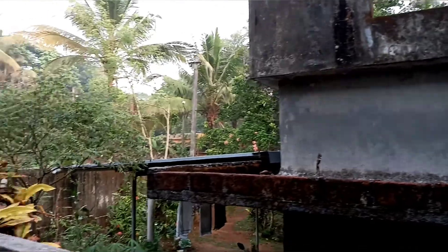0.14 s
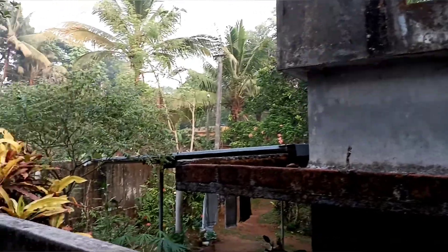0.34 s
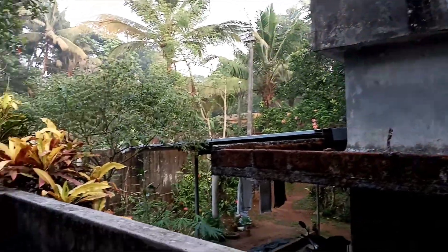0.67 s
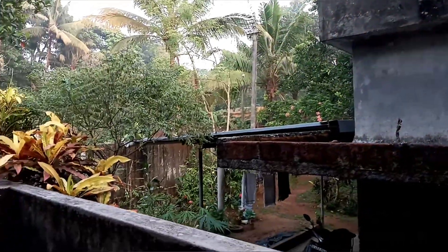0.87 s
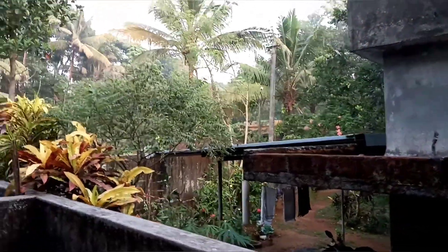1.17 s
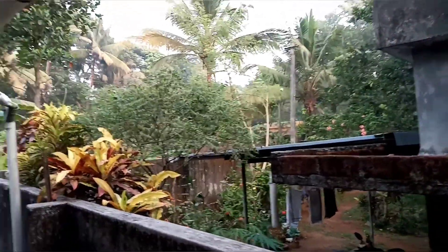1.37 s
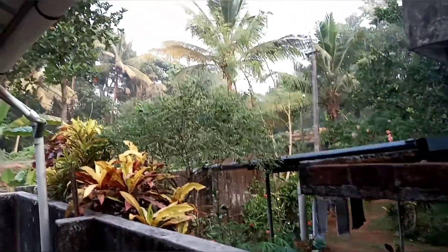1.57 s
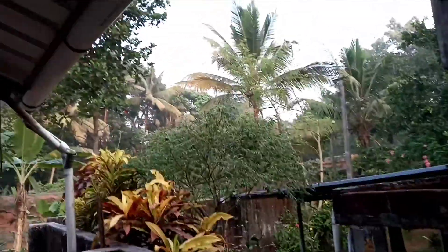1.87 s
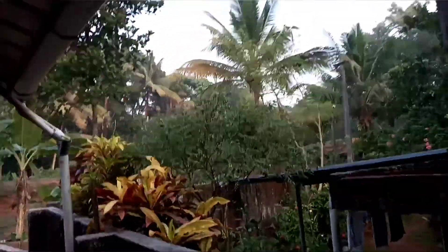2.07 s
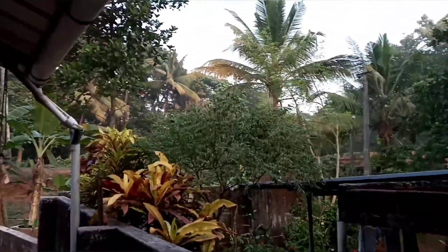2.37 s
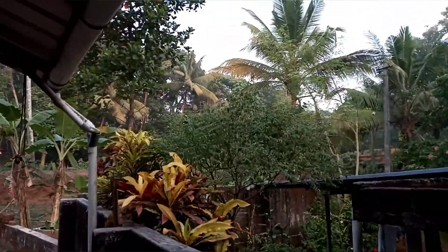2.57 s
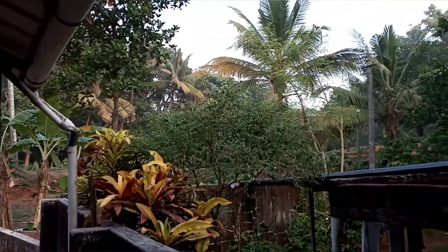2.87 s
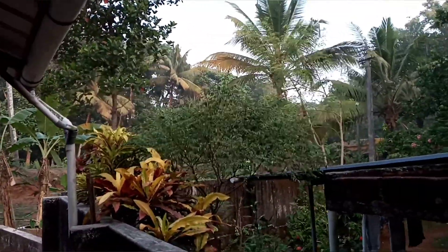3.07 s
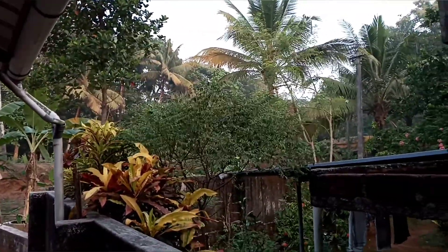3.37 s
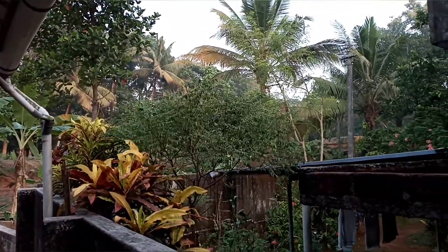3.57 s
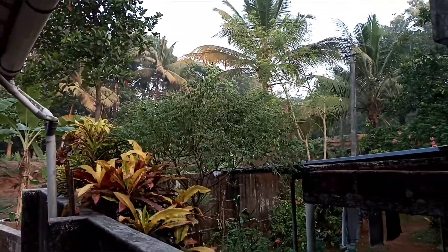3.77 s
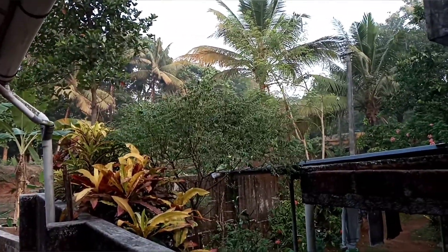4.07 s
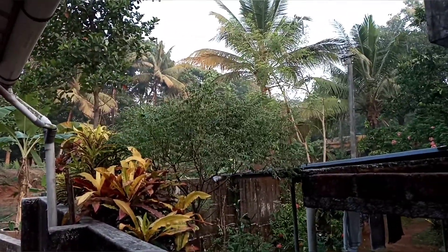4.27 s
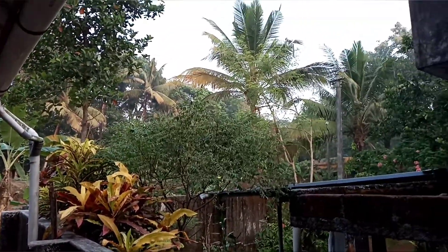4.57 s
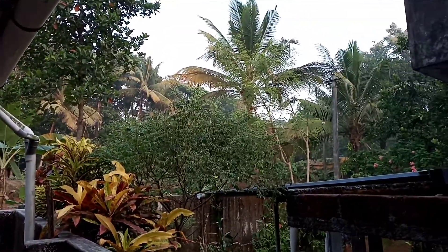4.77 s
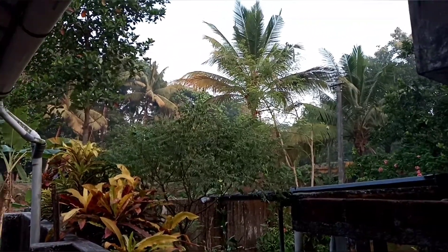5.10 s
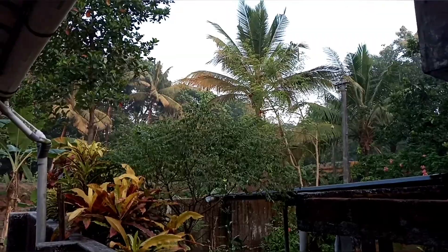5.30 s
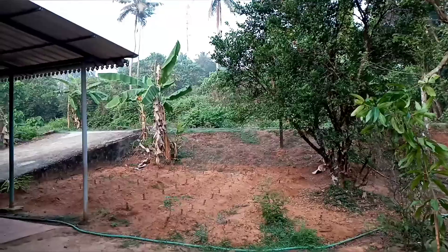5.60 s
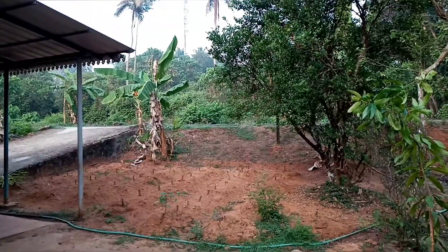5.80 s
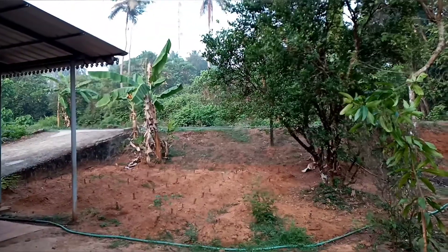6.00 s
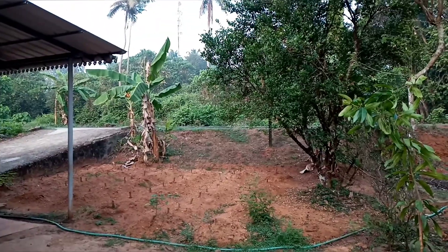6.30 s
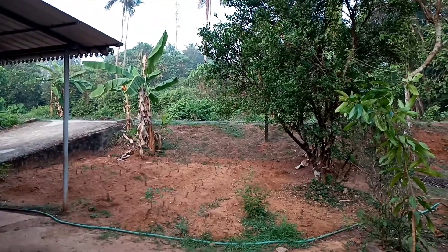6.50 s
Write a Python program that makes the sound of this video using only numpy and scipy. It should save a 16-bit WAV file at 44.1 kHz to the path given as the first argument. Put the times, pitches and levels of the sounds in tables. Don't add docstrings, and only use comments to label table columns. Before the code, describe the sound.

Many small birds pipe, chirp and whistle through reverberant trees over high pulsing crickets and a soft low hum. A hollow, woody tok repeats steadily through most of the first spot. The phone in the hand adds cloth rustles, clicks and dull bumps; a splintery snap is followed by a short scrape of a sole on concrete. After a sudden cut the birds thin out, a crow caws once, and breeze ends with a bump.

```python
import sys
import numpy as np
from scipy import signal
from scipy.fft import rfft, irfft, next_fast_len
from scipy.io import wavfile

SR = 44100
rng = np.random.default_rng(int(sys.argv[2]) if len(sys.argv) > 2 else 0)


def put_to_file(sound):
    columns = np.atleast_2d(sound).T
    safe = np.clip(columns, -1, 1)
    whole_steps = np.round(safe * 32767)
    wavfile.write(sys.argv[1], SR, whole_steps.astype(np.int16))


def natural_amplitude(level_db):
    exponent = np.asarray(level_db, float) / 20
    return 10 ** exponent


N = 293265
CUT_S = 5.572


def unit(x):
    return x / np.sqrt(np.mean(x ** 2) + 1e-20)


def in_time(rows, outside=None):
    s, *columns = np.transpose(rows)
    return [np.interp(np.arange(N) / SR, s, c, outside, outside) for c in columns]


def colour(x, spectrum):
    hz, db = np.transpose(spectrum)
    size = next_fast_len(len(x))
    grid_hz = np.arange(size // 2 + 1) * SR / size + 1
    gain = natural_amplitude(np.interp(np.log(grid_hz), np.log(hz), db))
    return irfft(rfft(x, size) * gain, size)[:len(x)]


def band(x, low_hz, high_hz, order=2):
    sos = signal.butter(order, [low_hz, min(high_hz, .45 * SR)], "band", fs=SR, output="sos")
    return signal.sosfilt(sos, x)


def drift(rate_hz):
    knots = rng.standard_normal(400)
    return np.interp(np.arange(N) / SR * rate_hz * 2, np.arange(400), knots) * 2.47


def add(out, s, sound):
    i = max(round(s * SR), 0)
    out[i:i + len(sound)] += sound[:N - i]


def bed(first_db, turn_db, loss_db, fade_db):
    t = np.arange(N) / SR
    before_db = first_db + turn_db * np.minimum(t, CUT_S)
    return natural_amplitude(before_db - (t >= CUT_S) * (loss_db + fade_db * (t - CUT_S)))


def swells(rows, order):
    t = np.arange(N) / SR
    return sum(natural_amplitude(db) * np.exp(-((t - s) / half_s) ** order) for s, half_s, db in rows)


def trees(x, t60, wet_db, build_s=0.0086, direct_db=0., lumps_db=5.0):
    t = np.arange(round(1.2 * SR)) / SR
    lumps = natural_amplitude(lumps_db * np.interp(t, np.arange(50) / 40, rng.standard_normal(50)))
    tail = rng.standard_normal(len(t)) * lumps * natural_amplitude(-60 * t / t60) * (1 - np.exp(-t / build_s))
    tail /= np.sqrt(np.sum(tail ** 2))
    return natural_amplitude(direct_db) * x + natural_amplitude(wet_db) * signal.fftconvolve(x, tail)[:N]


def whistle(length_s, hz, edge=0.052, second_db=-29.0):
    u = np.linspace(0, 1, max(round(length_s * SR), 8))
    waver = 1 + .008 * np.interp(u * length_s, np.arange(40) / 110, rng.standard_normal(40))
    pitch_hz = waver * np.polyval(np.polyfit([0, .5, 1], hz, 2), u)
    phase = 2 * np.pi * np.cumsum(pitch_hz) / SR
    shape = np.sin(np.pi / 2 * np.clip(np.minimum(u, 1 - u) / edge, 0, 1)) ** 2
    return np.sqrt(2) * shape * (np.sin(phase) + natural_amplitude(second_db) * np.sin(2 * phase))


def choir(rows, t60, wet_db, direct_db, flicker_db):
    out = np.zeros(N)
    for s, length_s, *hz, db in rows:
        add(out, s, natural_amplitude(db) * whistle(length_s, hz, edge=0.11))
    flicker = natural_amplitude(flicker_db * np.clip(drift(40), -3, 1.2))
    return natural_amplitude(direct_db) * flicker * out + trees(out, t60, wet_db, direct_db=-99.5)


def glides(rows):
    return [(s, length_s, hz * 2 ** (-step / 24), hz, hz * 2 ** (step / 24), db)
            for s, length_s, hz, step, db in rows]


def hiss():
    # middle_s, half_length_s, share_lost
    dips = [
        (3.42, .06, .6),
        (3.56, 0.073, .6),
        (3.82, 0.055, .5),
        (4.051, 0.032, 0.76),
        (4.25, 0.2, 1),
        (4.597, .25, 0.72),
        (5.15, .12, 0.34),
    ]
    t, noise = np.arange(N) / SR, rng.standard_normal((3, N))
    lost = sum(share * np.exp(-((t - s) / half_s) ** 2) for s, half_s, share in dips)
    low = natural_amplitude(2.5 * drift(15)) * band(noise[0], 10000, 11500)
    low += natural_amplitude(2.5 * drift(15)) * band(noise[1], 11500, 13200)
    return natural_amplitude(-71.0) * np.clip(1 - lost, .05, 1) * low + natural_amplitude(-68.5) * band(noise[2], 13200, 16000, order=3)


def background():
    # hz, level_db_per_hz
    air_tone = [(300, -24), (450, -8), (2000, -6.5), (3500, -11.5), (5500, -18), (7100, -22.5),
                (8400, -15.5), (11000, -18.5)]
    # hz, level_db_per_hz
    hum_tone = [(25, -42.5), (75, -3.5), (139, 0.5), (160, -4.5), (188, 7.5), (221, -3.5), (339, -2.5),
                (800, -58)]
    # hz, level_db_per_hz
    breeze_tone = [(22, -8), (103, 2.5), (146, 0), (237, -17), (400, -27.5), (520, -57.5), (880, -120)]
    # first_db, turn_db_per_s, loss_db at the second spot, fade_db_per_s there
    beds = [
        (-71, -0.11, 2, -0.5),
        (-69.5, 0.042, 6, -0.5),
        (-80.5, -.5, -19.5, 4),
    ]
    # middle_s, half_length_s, level_db
    rumble_swells = [
        (1.5, 0.64, -80.5),
        (5.55, 0.11, -63),
    ]
    # middle_s, half_length_s, level_db
    gusts = [
        (0, 0.11, -72),
        (1.6, 0.24, -81),
        (2.5, 0.32, -80.5),
        (4.2, 0.24, -74),
        (6.15, .2, -72),
        (6.68, 0.069, -45.5),
    ]
    noise = rng.standard_normal((4, N))
    air, edges_hz = colour(noise[0], air_tone), 400 * 2 ** np.arange(0, 4.8, 1 / 3)
    patches = sum(natural_amplitude(.9 * drift(3) + .9 * drift(9)) * band(air, lo, hi)
                  for lo, hi in zip(edges_hz, edges_hz[1:]))
    far, rumble, wind = [bed(*row) for row in beds]
    far = far + natural_amplitude(-72.0) * np.exp(-np.arange(N) / SR / 0.33)
    patches = far * patches / np.std(band(patches, 330, 2730))
    hum = (rumble + swells(rumble_swells, order=2)) * natural_amplitude(1.1 * drift(13)) * unit(colour(noise[1], hum_tone))
    breeze = (wind + swells(gusts, order=2)) * natural_amplitude(1.33 * drift(9.7)) * unit(colour(noise[2], breeze_tone))
    return patches + band(hum, 55, 2000, order=3) + band(breeze, 40, 2000, order=3) + hiss()


def crickets():
    # first_db, turn_db_per_s, loss_db at the second spot, fade_db_per_s there
    bands = [
        (-70, -0.66, 10.5, -2),
        (-63, 0.34, 6, 5.5),
        (-68.5, 0.17, 8, 17),
        (-66.5, 1.0, 5.5, 2),
    ]
    # middle_s, half_length_s, level_db
    buzzes = [(0.084, 0.052, -54), (0.324, 0.041, -53), (0.532, 0.054, -54.5), (0.774, 0.047, -54.5),
              (1.26, 0.043, -70), (1.52, 0.049, -74), (1.735, 0.1, -61.5), (2.443, 0.16, -69.5),
              (2.917, 0.18, -64.5), (4.549, 0.045, -53.5), (4.775, 0.047, -51), (4.966, 0.056, -68.5),
              (5.154, 0.042, -67.5), (5.405, 0.057, -68.5), (6.252, 0.28, -77.5), (6.574, 0.029, -92)]
    throb_hz, throb_start_s, skip_at_s, skip_cycles = 10.8, .063, 2.6, .41
    pip_hz, pip_start_s = 10.77, .04
    opening_db, opening_s = -53, 0.088
    buzz, low, mid, top = [bed(*row) for row in bands]
    t = np.arange(N) / SR
    first_spot = t < CUT_S
    cycle = ((t - throb_start_s) * throb_hz + skip_cycles * (t > skip_at_s) + .5) % 1 - .5
    throb = np.where(first_spot, 0.29 + 0.78 * np.exp(-(cycle / 0.47) ** 2), .7)
    dip = np.where(first_spot, 0.39 + 0.95 * natural_amplitude(1.9 * drift(2.7)) * np.exp(-(cycle / 0.12) ** 2), .5)
    beat = ((t - pip_start_s) * pip_hz + .5) % 1 - .5
    pip_gain = first_spot * np.clip((t - 2.8) / 1.24, .25, 1) * natural_amplitude(4.0 + 0.64 * drift(6.3))
    pip = pip_gain * np.exp(-(beat / 0.1) ** 2) * np.sin(2 * np.pi * 8960 * t)
    buzz = buzz + swells(buzzes, order=2)
    top = top + natural_amplitude(opening_db) * np.exp(-t / opening_s)
    noise = rng.standard_normal((5, N))
    out = buzz * unit(band(noise[0], 4244, 4983, order=4))
    low_wings = unit(band(noise[1], 6118, 6360) + 0.72 * band(noise[2], 6340, 6700))
    out += low * natural_amplitude(0.95 * drift(20)) * low_wings
    mid_wings = throb * unit(band(noise[3], 7850, 7973)) + dip * unit(band(noise[3], 7495, 7820, order=3))
    out += mid * natural_amplitude(1.05 * drift(5.4)) * mid_wings
    return out + top * natural_amplitude(0.21 * drift(0.92)) * (unit(band(noise[4], 8676, 9544, order=3)) + pip)


def crow():
    # start_s, pitch_hz, level_db
    caw = [
        (5.675, 521.5, -73),
        (5.7, 526.4, -52.5),
        (5.75, 545, -52),
        (5.8, 531, -52),
        (5.835, 501, -59.5),
        (5.855, 522, -88),
    ]
    # multiple, level_db
    orders = [(2, -9.5), (3, 4), (4, 8), (5, -24)]
    hz, db = in_time(caw)[0], in_time(caw, outside=-140)[1]
    shake = unit(band(rng.standard_normal(N), 24, 93, order=1))
    phase = 2 * np.pi * np.cumsum(hz * (1 + .021 * shake)) / SR
    voice = sum(natural_amplitude(order_db) * np.sin(k * phase) for k, order_db in orders)
    return trees(natural_amplitude(db) * voice, 0.53, -5.5, direct_db=-0.5)


def twitter():
    # start_s, length_s, pitch_hz, level_db
    pipes = [(.265, 0.043, 3950, -63), (0.3, 0.11, 3910, -51.5), (0.619, 0.247, 3972, -58.5),
             (0.835, 0.17, 3230, -63.5), (.96, 0.033, 5450, -72), (1.012, 0.026, 2470, -63.5),
             (1.039, 0.052, 5600, -64.5), (1.122, 0.053, 2730, -65.5), (1.137, 0.073, 5585, -57),
             (1.216, 0.043, 3477, -52.5), (1.645, 0.054, 4730, -62), (1.655, 0.045, 4310, -56),
             (1.718, 0.078, 4000, -60.5), (1.939, 0.029, 2420, -67), (2.045, 0.045, 5227, -55.5),
             (2.703, 0.042, 3169, -73), (3.368, 0.087, 2760, -67.5), (4.6, 0.13, 1846, -66.5),
             (5.108, 0.051, 3500, -69.5), (2.045, 0.058, 6597, -62.5), (4.903, 0.025, 2324, -65.5),
             (5.535, .025, 5560, -73), (6.42, 0.06, 1658, -74)]
    # start_s,
    # length_s, middle_hz, glide_semitones (negative falls), level_db
    sliding_calls = [(0.86, 0.11, 4110, 1.9, -56.5), (.95, 0.14, 4318, 0.1, -60), (.9, 0.14, 4010, 0.8, -63),
                     (1.183, 0.032, 3000, 3, -63), (1.197, 0.023, 3290, 1.8, -54.5),
                     (1.322, 0.037, 2450, 1.2, -61.5), (1.432, 0.04, 3210, 3.5, -60),
                     (1.468, 0.037, 3500, 1.5, -56.5), (1.492, 0.036, 3800, -2, -73),
                     (1.559, 0.14, 2060, 2.8, -68.5), (1.931, 0.047, 3075, 1.5, -63),
                     (2.196, 0.096, 2820, 2.3, -57), (2.22, 0.094, 5110, 1.1, -57.5), (2.513, 0.11, 4300, 1, -69),
                     (2.8, 0.29, 4860, 1.8, -81), (2.97, 0.059, 2660, 3, -72), (3.04, 0.027, 2850, 0.5, -69),
                     (3.066, 0.044, 3067, 0.2, -60), (4.205, 0.063, 3080, 1.1, -64),
                     (4.49, 0.098, 2770, 2.1, -58.5), (4.903, 0.058, 3140, 3, -72.5),
                     (5.073, 0.053, 7020, -0.5, -68), (5.71, .1, 3955, .5, -68.5), (5.84, 0.094, 2560, 1, -72.5),
                     (5.9, 0.087, 4510, -1, -84), (6.17, 0.11, 4870, .3, -78), (6.4, .13, 5450, -.4, -82),
                     (6.42, 0.1, 1980, 1.7, -72), (6.51, 0.053, 2950, -0.2, -79.5), (6.55, .08, 4930, -0.7, -79),
                     (.05, 0.057, 3320, -1, -64), (0.168, 0.097, 3065, -3.0, -55.5),
               (.29, 0.046, 2430, -1.5, -57.5), (.66, 0.09, 3320, 0, -72),
               (1.682, 0.045, 3730, -4.5, -59.5), (2.071, 0.1, 4880, -1.5, -59),
               (2.562, 0.061, 3310, -1.2, -67), (2.659, 0.187, 1139, -2, -70.5),
               (3.398, 0.095, 2045, -0.5, -64), (3.53, 0.032, 1883, -2.5, -56), (4.82, 0.13, 2380, -2, -71)]
    level = [(s, length_s, hz, 0, db) for s, length_s, hz, db in pipes]
    near = choir(glides(level), .45, 1.5, -2.5, 2.5)
    far = choir(glides(sliding_calls), .48, 1.0, -3.5, 2.5)
    return (near + far) * natural_amplitude(1.0 * drift(25))


def chips():
    # start_s, top_hz, level_db
    calls = [(0.072, 3740, -66.5), (1.091, 3710, -62), (2.287, 3710, -66.5), (2.83, 3515, -65.5),
             (3.419, 3650, -63.5), (3.839, 3618, -66), (4.387, 3550, -66.5), (4.683, 3790, -65.5),
             (5.299, 3660, -67), (5.565, 3540, -71.5), (6.105, 3600, -70)]
    out = np.zeros(N)
    for s, hz, db in calls:
        hold = whistle(.016, (hz * 1.02, hz, hz * 0.97), edge=0.25, second_db=-2)
        fall = whistle(.03, (hz * .96, hz * .82, hz * 0.59), edge=0.13, second_db=-7)
        add(out, s, natural_amplitude(db) * hold)
        add(out, s + 0.0074, natural_amplitude(db - 8.5) * fall)
    hoarse = 1 + 0.36 * unit(band(rng.standard_normal(N), 65, 340))
    return trees(out * hoarse, 0.58, 8.45, build_s=0.0071, direct_db=2.5)


def phrase(s, pause_s, db, factor, arch_db):
    # offset_s, length_s, start_hz, middle_hz, end_hz, level_db
    dip = [
        (0, 0.033, 2040, 1860, 2070, -7.5),
        (0.028, 0.029, 2000, 1940, 1720, -1.5),
        (0.052, 0.084, 1700, 1820, 1904, 0),
    ]
    arch = [
        (0, .05, 1960, 2130, 2240, -8.5),
        (.045, .04, 2240, 2250, 2220, -2),
        (.09, .075, 2215, 2140, 1929, -1),
        (.165, .06, 1900, 1650, 1453, -11),
    ]
    return [(start_s + at_s, length_s, *(factor * np.array(hz)), db + more_db + note_db)
            for start_s, motif, more_db in ((s, dip, 0), (s + pause_s, arch, arch_db))
            for at_s, length_s, *hz, note_db in motif]


def songster():
    # start_s, dip_to_arch_s, level_db, pitch_factor, arch_over_dip_db
    phrases = [
        (.045, 0.3, -49, 0.97, 2),
        (1.902, 0.32, -47.5, 1, 1.2),
        (3.8, .318, -46.5, 1.0, 1.5),
        (5.502, 0.35, -47.5, 1.054, 0),
    ]
    late = (5.5, 0, -57.5, 1, 2)
    # start_s, length_s, middle_hz, glide_semitones, level_db
    asides = [
        (0, 0.4, 1603, 0.045, -60),
        (.6, 0.0384, 1820, -2, -52),
    ]
    first = choir(sum((phrase(*p) for p in phrases), glides(asides)), 1.41, 0.23, -1.6, 1.87)
    second = choir(phrase(*late), 1.2, 1.8, -3.5, 1.8)
    return np.where(np.arange(N) / SR < CUT_S, first, second)


def grit(per_s, spread_db):
    sizes = natural_amplitude(spread_db * np.minimum(rng.exponential(1, N), 2.5)) * rng.choice([-1, 1], N)
    return unit((rng.random(N) < per_s / SR) * sizes)


def rustles(grains):
    # start_s, hold_s, low_hz, high_hz, level_db
    rubs = [(0.885, 0.017, 3470, 12040, -53), (0.94, 0.026, 2500, 9000, -61), (1.15, 0.16, 5940, 6900, -61),
            (1.68, 0.1, 4100, 6200, -57.5), (1.695, 0.13, 6600, 8300, -59.5),
            (1.83, 0.011, 4570, 11400, -46.5), (1.84, 0.063, 1750, 8400, -53),
            (1.795, .03, 14000, 16000, -60), (.88, .02, 13800, 16000, -63),
            (1.902, 0.12, 2600, 7200, -60.5), (2.1, 0.055, 4000, 8800, -68), (2.4, 0.11, 3400, 4900, -62.5),
            (2.397, 0.088, 4100, 6900, -56), (2.5, 0.073, 2610, 3400, -65.5),
            (1.05, .18, 3300, 3800, -70.5), (1.56, 0.27, 2500, 3800, -69), (2.504, 0.11, 3884, 5200, -61),
            (2.82, 0.057, 2100, 5300, -66), (3.184, 0.094, 5100, 6900, -64),
            (3.13, 0.0089, 880, 11100, -47.5), (3.348, 0.016, 680, 7700, -51.5),
            (3.361, 0.036, 610, 4400, -59), (4.353, 0.076, 4430, 6400, -63),
            (4.378, 0.022, 5300, 7600, -54), (4.718, 0.021, 6000, 6700, -55),
            (4.02, 0.076, 1550, 2500, -62), (6.247, 0.022, 800, 2200, -70),
            (6.578, 0.087, 800, 2360, -62.5), (6.105, .1, 3150, 3820, -68.5),
            (5.57, 0.063, 2900, 3700, -71)]
    rise_max_s, halving_oct, sag_db, end_s = 0.029, 0.94, 3, 0.016
    out = np.zeros(N)
    for s, hold_s, low_hz, high_hz, db in rubs:
        rise_s = rise_max_s * (low_hz / high_hz) ** (1 / halving_oct)
        t = np.arange(round((rise_s + hold_s + 5 * end_s) * SR)) / SR
        shape = np.clip(t / rise_s, 0, 1) ** 2 * natural_amplitude(3 - sag_db * t / hold_s)
        shape *= np.exp(-np.maximum(t - rise_s - hold_s, 0) / end_s)
        piece = np.roll(grains, -round(s * SR))[:len(t)]
        add(out, s, natural_amplitude(db) * shape * unit(band(piece, low_hz, high_hz, order=3)))
    return out


def sandal_scuff(grains):
    # time_s, level_db, bright_grit_db
    course = [
        (3.9, -58, 7),
        (3.912, -41.5, -10),
        (3.93, -34, -13),
        (3.985, -34, -13.5),
        (3.998, -38, -35),
        (4.012, -39, -2.5),
        (4.028, -47.5, -10),
        (4.032, -74, -10),
    ]
    # hz, level_db_per_hz
    tone = [(110, -32.5), (200, -16.5), (754, -12.5), (1340, -2), (2870, 2.5), (5400, -15), (9500, -47.5),
            (16000, -97)]
    db, bright_db = in_time(course, outside=-99.5)
    noise = grit(12000, 2.9)
    drag = unit(colour(noise, tone))
    bright = natural_amplitude(bright_db) * unit(band(grains, 5140, 6800))
    top_gain = natural_amplitude(-18.5) * np.clip((3.998 - np.arange(N) / SR) / 0.013, .3, 1)
    return natural_amplitude(db) * (drag + bright + top_gain * unit(band(noise, 8900, 22000)))


def knocks():
    # start_s, ring_hz, t60_s, level_db
    ticks = [(.371, 3280, 0.013, -37), (.372, 5990, 0.01, -35), (.748, 2796, 0.0018, -31),
             (1.248, 2660, 0.0035, -56), (1.826, 6370, 0.021, -33.5), (1.843, 3280, 0.0056, -38),
             (1.87, 6070, .005, -40), (1.885, 8460, 0.0066, -48), (1.984, 6360, .008, -39),
             (2.62, 11250, 0.0041, -30), (4.148, 1290, 0.031, -49), (4.146, 2910, 0.026, -51),
             (4.153, 2520, .02, -46), (5.364, 1340, 0.0061, -24.5), (6.11, 12500, 0.013, -44),
             (6.208, 600, 0.0066, -48), (6.2514, 1380, 0.0052, -38.5), (6.293, 1460, 0.0052, -46),
             (4.31, 794, 0.037, -54), (6.112, 4700, .006, -53), (1.858, 4450, 0.0037, -42),
             (1.92, 7000, .004, -46), (.07, 710, 0.21, -57.5), (.408, 1110, 0.028, -46.5),
             (5.834, 4700, 0.0068, -39.5)]
    snaps = [
        (3.332, 8200, .01, -37),
        (3.3344, 2270, 0.017, -17.5),
        (3.338, 769, 0.046, -32),
        (3.342, 3900, 0.0062, -23),
        (5.574, 3050, 0.0034, -36),
        (5.82, 2500, 0.0032, -38),
    ]
    bumps = [(.385, 197, 0.23, -54.5), (.666, 384, 0.031, -41.5), (.729, 194, 0.26, -49),
             (.752, 273, 0.11, -51), (.96, 340, 0.084, -55.5), (1.35, 320, 0.11, -52),
             (1.55, 75, 0.11, -51), (1.86, 129, .1, -49.5), (2.05, 130, 0.17, -51), (2.44, 346, .12, -53),
             (2.575, 69, 0.098, -50), (2.77, 82.7, 0.14, -57), (4.305, 341, 0.027, -32.5),
             (5.3635, 364.7, 0.022, -24.5), (5.362, 110, 0.068, -42.5), (3.35, 70.4, .12, -56),
             (4.14, 69.96, .12, -56), (5.465, 331, 0.063, -47), (6.094, 320, 0.037, -42.5),
             (6.63, 348, 0.023, -31), (6.634, 100, 0.14, -27)]
    out, t = np.zeros(N), np.arange(round(.1 * SR)) / SR
    for rows, crack in ((ticks, 0.024), (snaps, 0.5), (bumps, 0.022)):
        noises = band(rng.standard_normal((len(rows), len(t))), 670, 7000, order=1)
        for (s, hz, t60, db), noise in zip(rows, noises):
            ring = (1 - crack) * np.sin(2 * np.pi * hz * t)
            burst = crack * noise * natural_amplitude(-60 * t / 0.067)
            add(out, s, natural_amplitude(db - 60 * t / t60) * np.clip(t * hz / 1.14, 0, 1) * (ring + burst))
    return out


def handling():
    grains = grit(7000, 3.7) * natural_amplitude(1.25 * drift(28))
    close = trees(rustles(grains) + knocks(), 0.3, -12.0, build_s=0.0033)
    return close + trees(sandal_scuff(grains), 0.15, -33, build_s=0.0027)


def toks():
    # start_s, peak_db, pitch_hz
    calls = [(0.676, -40, 1476), (1.0285, -36, 1507), (1.4279, -36.5, 1512), (1.8199, -33.5, 1532),
             (2.1613, -37.5, 1493), (2.4889, -35, 1507), (2.835, -36, 1534), (3.212, -37, 1494),
             (3.568, -38.5, 1470), (3.972, -42, 1497), (4.3947, -39.5, 1498)]
    # delay_s, level_db
    paths = [(.013, -7), (.026, -11), (0.052, -9.5), (.082, -14), (.15, -29.5), (0.219, -24)]
    wall_turns = [(0.1, -0.57, 0.39), (0.24, 0.063, -0.3), (-0.47, 0.53, 0.16), (0.27, 0.31, -0.13),
                  (0.46, -0.41, 0.19), (0.26, 0.45, 0.23), (0.36, 0.18, 0.34), (-0.21, -0.37, 0.016),
                  (0.15, -0.49, -0.07), (0.26, 0.17, .12), (0.16, -0.24, 0.19)]
    out, t = np.zeros(N), np.arange(round(0.034 * SR)) / SR
    shape = np.clip(t / 0.0023, 0, 1) * natural_amplitude(-5 * np.clip(t / 0.014, 0, 1)) * np.clip((t[-1] - t) / 0.007, 0, 1)
    fall = 1 + .05 * np.exp(-t / .004) + .03 * np.exp(-t / .014)
    for (s, db, hz), turns, sway in zip(calls, wall_turns, rng.standard_normal((len(calls), 8))):
        sway[:3] = turns
        note = natural_amplitude(db + 1.5) * shape * np.sin(2 * np.pi * np.cumsum(hz * fall) / SR)
        add(out, s - .003, note)
        for (lag_s, path_db), turn in zip(paths, sway):
            add(out, s + lag_s + 0.000947 * turn, natural_amplitude(path_db + 2.0 * turn) * note)
    return trees(out, 0.75, -8.5, build_s=0.016)


def scene():
    # from_s, to_s
    spans = [(3.32, 3.43), (3.51, 3.57), (3.79, 4.88), (4.92, 5.24), (5.31, 5.52), (5.66, 5.7),
             (6.09, 6.17), (6.38, 6.42)]
    birds = toks() + songster() + twitter() + chips() + crow()
    mono, t = birds + crickets() + handling() + background(), np.arange(N) / SR
    apart = sum((t > start_s) * (t < end_s) for start_s, end_s in spans)
    side = natural_amplitude(-8.0) * apart * band(np.roll(mono, 200), 12700, 17100, order=3)
    return mono + side * [[1], [-1]]


def top_cut(x):
    return signal.sosfilt(signal.butter(12, 17100, fs=SR, output="sos"), x)


def record(dry):
    # hz, level_db
    mic = [(20, 1), (9300, -2), (9900, -15), (10800, -20), (13300, -18.5), (14600, -14), (15400, -5),
           (20000, -27.5)]
    wall = signal.ellip(10, .5, 60, 15680, fs=SR, output="sos")
    mix = signal.sosfilt(wall, [colour(c, mic) for c in dry])
    return top_cut(mix)


dry = scene()
out = record(dry)
put_to_file(out)
```